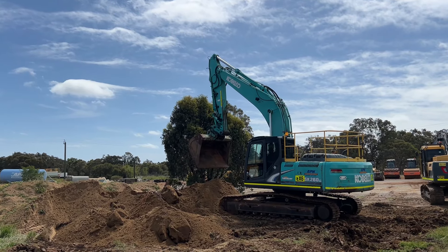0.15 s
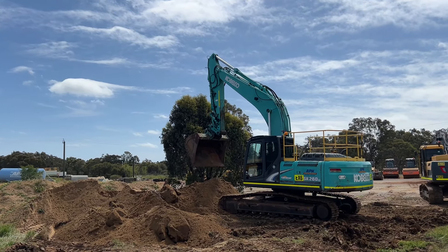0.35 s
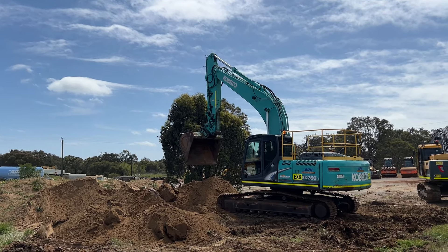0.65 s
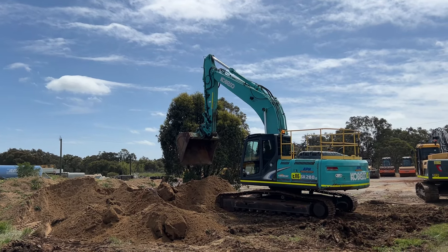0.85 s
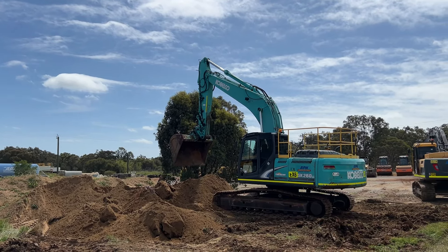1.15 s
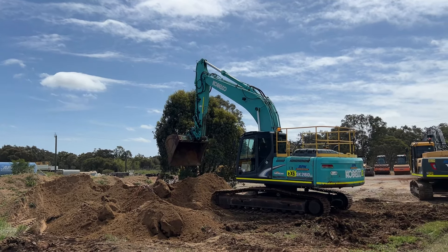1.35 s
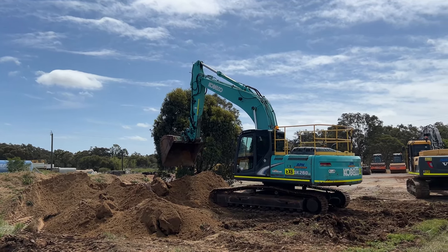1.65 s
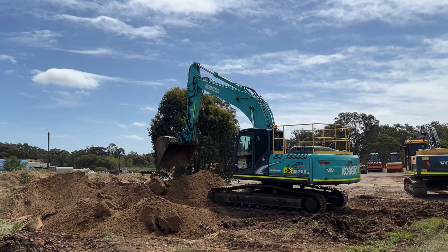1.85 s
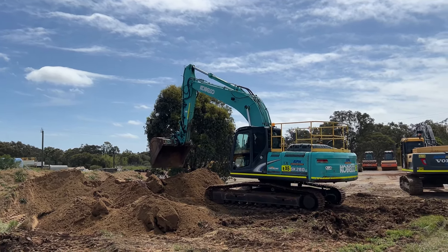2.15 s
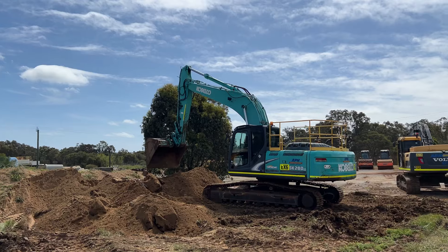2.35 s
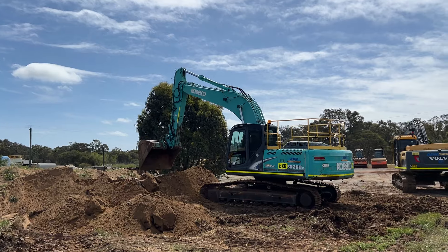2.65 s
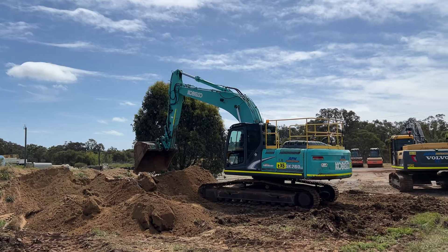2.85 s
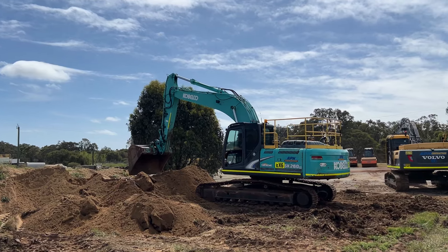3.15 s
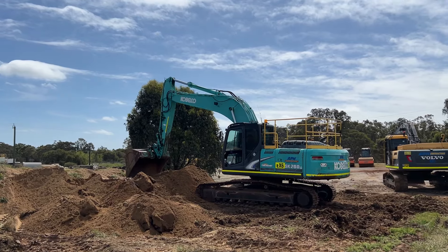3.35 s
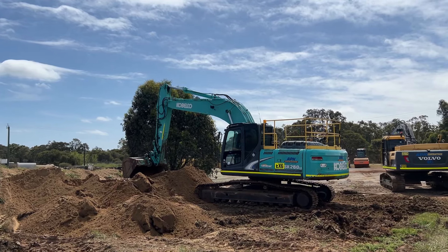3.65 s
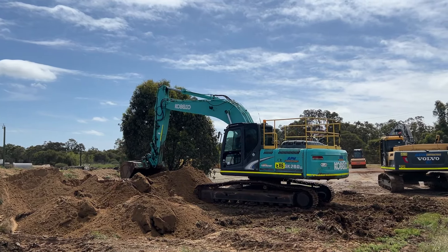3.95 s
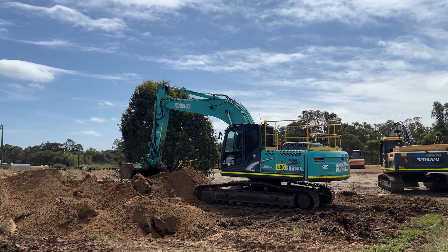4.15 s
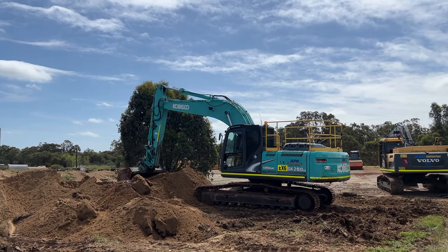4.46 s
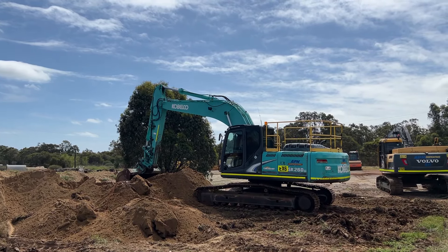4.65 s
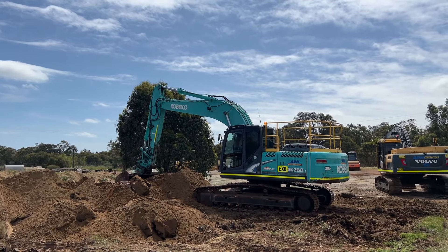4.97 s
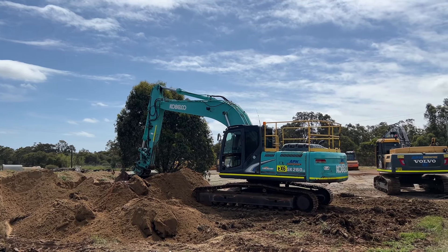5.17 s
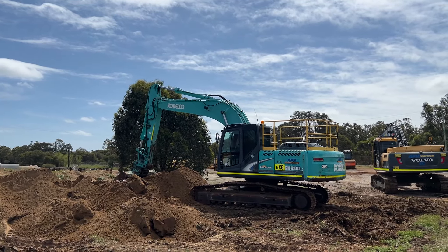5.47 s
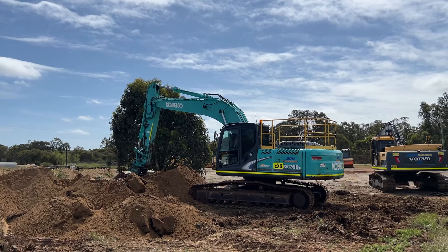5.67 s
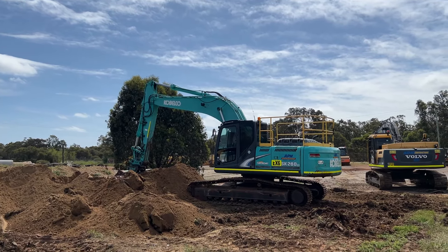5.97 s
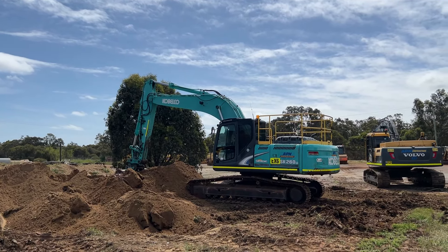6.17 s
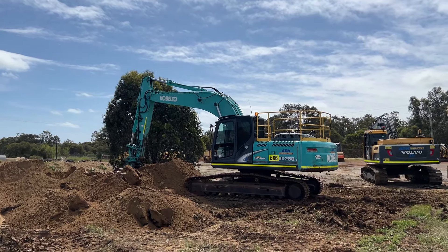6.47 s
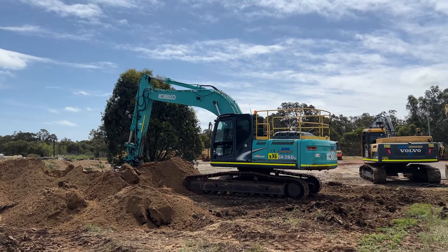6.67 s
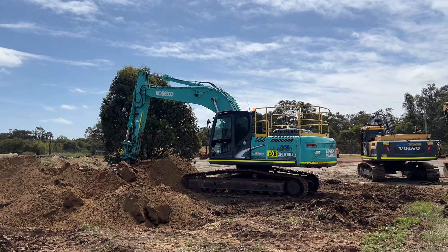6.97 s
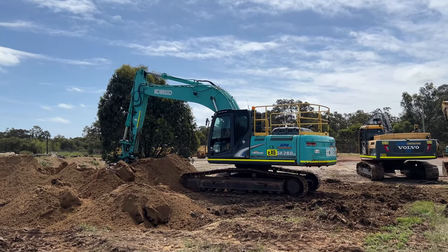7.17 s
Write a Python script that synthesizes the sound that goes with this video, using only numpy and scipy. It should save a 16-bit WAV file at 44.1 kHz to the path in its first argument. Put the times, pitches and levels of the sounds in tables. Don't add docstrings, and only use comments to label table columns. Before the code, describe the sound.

A buffeting, fluttering gust opens the scene and dies quickly, leaving a steady four-cylinder diesel rumble with knocking, gear rattle, cooling fan roar and a faint high turbo whistle. Other parked machines idle low behind it. Soft puffs of breeze brush the phone microphone. Midway the hydraulics whine and the engine labours; in the last second and a half a strong pump drone joins the lowered engine note. Open air, slightly distant stereo.

```python
import sys
import numpy as np
from scipy import signal
from scipy.fft import rfft, irfft
from scipy.io import wavfile
from scipy.ndimage import uniform_filter1d

SR = 44100
rng = np.random.default_rng(int(sys.argv[2]) if len(sys.argv) > 2 else 0)


def ratio_of_db(decibels):
    return 10 ** (np.asarray(decibels, float) / 20)


def wav_record(signal):
    frames = np.transpose(np.atleast_2d(signal))
    bounded = np.clip(frames, -1, 1)
    quanta = np.round(bounded * 32767).astype(np.int16)
    wavfile.write(sys.argv[1], SR, quanta)


N = 322812
T = np.arange(N) / SR
HZ = np.maximum(np.arange(N // 2 + 1) * SR / N, 1)
PORT_SIDES = np.array([[.5], [-.5]])

# time in seconds, firing rate in Hz.
FIRING = [
    (0, 74.65),
    (4.05, 74.65),
    (4.2, 73.3),
    (5.72, 73.25),
    (5.88, 72.65),
    (6.3, 72.3),
    (7.32, 72.25),
]
# time in seconds, pitch in Hz, level in dB rms.
TURBO = [(0, 12300, -80), (.8, 11600, -67), (3.2, 11440, -59), (3.95, 11450, -63), (4.15, 12500, -72),
         (4.6, 13710, -60), (5.0, 13200, -60), (5.6, 12800, -68), (6.2, 13300, -61), (6.6, 13200, -63),
         (7.32, 13100, -61)]


def columns(table):
    s, *rest = np.transpose(table)
    return [np.interp(T, s, c) for c in rest]


def walk(rate):
    hold = int(SR / rate)
    steps = np.repeat(rng.standard_normal(N // hold + 1), hold)
    return 0.99 * uniform_filter1d(uniform_filter1d(steps, hold), hold)[:N]


def colour(x, shape, db):
    hz, gain_db = np.transpose(shape)
    gain = ratio_of_db(np.interp(np.log(HZ), np.log(hz), gain_db, -120, -120))
    y = irfft(rfft(x) * gain, N)
    return y * ratio_of_db(db) / np.std(y)


def tone(turns, db, drift, breath_db=1.5):
    level = np.sqrt(2) * ratio_of_db(db + breath_db * walk(2.96))
    return level * np.sin(2 * np.pi * (turns + rng.random() + drift * walk(4.05)))


def rush(hz, db, width_hz):
    envelope = walk(width_hz) + 1j * walk(width_hz)
    carrier = np.exp(2j * np.pi * np.cumsum(hz) / SR)
    return ratio_of_db(db) * np.real(envelope * carrier)


def bands(x, edges_hz, gains_db):
    out, spectrum = x, rfft(x)
    below = [1 / (1 + (HZ / hz) ** 12) for hz in edges_hz]
    for low, high, gain_db in zip(below, below[1:], gains_db):
        out = out + (ratio_of_db(gain_db) - 1) * irfft(spectrum * (high - low), N)
    return out


def peaks(times, tops_db, rise, fall, floor_db):
    levels = [floor_db + 0 * T]
    for s, db in zip(times, tops_db):
        levels.append(db - np.where(T < s, rise * (s - T), fall * (T - s)))
    return np.max(levels, axis=0)


def gust():
    # time in seconds, rumble peak in dB, flutter peak in dB.
    bursts = [
        (.024, -16, -6),
        (.112, -14, -18),
        (.2, -20, -5),
        (.222, -11, -8),
        (.28, -30, -16),
        (.436, -27, -22),
    ]
    rise, fall = 550, 900
    fade_db = 37 * T
    times, low_db, flutter_db = np.transpose(bursts)
    low_db = peaks(times, low_db, rise, fall, -20 - fade_db)
    flutter_db = peaks(times, flutter_db, rise, fall, -26 - fade_db)
    low_shape = [(30, -30), (42, -6), (65, -5), (120, 0), (170, -17)]
    flutter_shape = [(130, -25), (200, 0), (450, -2), (700, -12), (1100, -35)]
    low = colour(rng.standard_normal(N), low_shape, -2.5) * ratio_of_db(low_db)
    flutter = colour(rng.standard_normal(N), flutter_shape, -13) * ratio_of_db(flutter_db)
    dying = np.clip((.62 - T) / .12, 0, 1) * np.clip(T / .006, 0, 1)
    return (low + flutter) * dying


def slaps():
    # time in seconds, peak in dB, swing rate in Hz, length in cycles.
    eddy_hits = [(0.0104, -8, 435, 1.04), (0.0186, -3.5, 372, 0.81), (.034, -10, 380, 0.92),
                 (.062, -9.5, 412, .5), (.096, -10, 398, .63), (.111, -9, 160, .33), (.192, -12, 450, 1),
                 (.199, -5, 317, 0.4), (.211, -8, 259, 1.24), (0.2187, -7, 290, 0.48),
                 (.2223, -7.5, 418, 0.4), (.281, -20, 382, 0.81), (.301, -24, 624, 1.4),
                 (.340, -16, 240, 0.46), (0.354, -21, 230, .8), (.382, -22, 200, 0.58),
                 (.413, -18, 448, .74), (.431, -20, 470, 1.8), (.455, -16.5, 378, .52),
                 (.477, -27, 250, .7), (.535, -22.5, 267, 1.05), (4.146, -17.5, 248, 3.3)]
    pan_db = 3.5
    out = np.zeros((2, N))
    for s, db, hz, cycles in eddy_hits:
        near = slice(max(int(s * SR) - 2000, 0), int(s * SR) + 2000)
        turns = (T[near] - s) * hz
        swing = np.cos(2 * np.pi * turns) + 0.063 * np.cos(2 * np.pi * 1.92 * turns)
        swell = np.exp(-(turns / cycles) ** 2)
        out[:, near] += swing * swell * ratio_of_db(db + pan_db * PORT_SIDES)
    return out


def breeze():
    # time in seconds, peak in dB.
    puffs = [
        (.06, -22.5),
        (.98, -26),
        (1.7, -27.5),
        (3.4, -41),
        (3.9, -39),
        (4.65, -38),
        (5.47, -30),
        (5.85, -31),
        (6.75, -31),
        (7.25, -32),
    ]
    shape = [(36, -34), (48, -5), (85, 0), (150, -4), (250, -17), (400, -38)]
    eddies = colour(rng.standard_normal((2, N)) * ratio_of_db(2.5 * walk(12)), shape, 1.2)
    return eddies * ratio_of_db(peaks(*np.transpose(puffs), rise=37, fall=37, floor_db=-38.5))


def engine_load():
    idle_hz, full_load_hz = 74.65, 72.25
    return (idle_hz - columns(FIRING)[0]) / (idle_hz - full_load_hz)


def exhaust(cycle, load):
    # multiple of the cycle, level in dB rms.
    orders = [
        (4, -23.5),
        (5, -44),
        (7, -33),
        (8, -32),
        (12, -39),
        (14, -42.5),
    ]
    beat = sum(tone(k * cycle, db, drift=0.029, breath_db=0.56) for k, db in orders)
    return beat + tone(15 * cycle, -53 + 17 * load, drift=0.031)


def gears(cycle, load):
    # multiple of the cycle, level in dB rms.
    meshes = [(62, -63), (63, -70), (64, -57.5), (78, -59.5), (83, -67), (97, -59.5), (104, -58),
              (108, -57.5), (123, -60.5), (132, -58)]
    rattle_db = 6 - 11 * load
    return sum(tone(k * cycle, db + rattle_db, drift=0.22) for k, db in meshes)


def pump(cycle, load):
    # time in seconds, drone level in dB rms.
    pressure = [(0, -58), (4.45, -45.5), (4.6, -33.5), (5.05, -43), (5.77, -40), (5.89, -22.5),
                (6.06, -19.5), (6.29, -25.5), (6.44, -21), (7.2, -25.5), (7.32, -23.5)]
    pistons = 18 * cycle
    drone = tone(pistons, columns(pressure)[0], drift=.03, breath_db=0)
    return drone + tone(pistons * 5, -64 + 17 * load, drift=.15)


def turbo_whistle():
    hz, db = columns(TURBO)
    return rush(hz, db, width_hz=450)


def valves():
    # time in seconds, centre in Hz, level in dB.
    strokes = [(0, 2296, -64), (2.3, 2322, -54), (3.2, 2235, -41), (3.7, 2180, -58), (4.2, 2300, -46.5),
               (5.0, 2327, -43), (5.9, 2286, -44.5), (6.7, 2179, -47), (7.32, 2245, -46)]
    hz, db = columns(strokes)
    second_hz = 1763 + .45 * (hz - hz.mean())
    return rush(hz, db, width_hz=100) + rush(second_hz, -48, width_hz=90)


def idlers():
    # pitch in Hz, level in dB rms.
    steady = [(39.7, -39), (42.3, -36), (50.3, -40), (59.6, -33.5), (65.3, -40), (79.7, -38.5), (89.8, -29),
              (100.4, -45.5), (108.7, -36.5), (166.2, -35), (179, -37), (212.6, -39), (239.9, -42.5),
              (623, -47)]
    return sum(tone(hz * T, db, drift=.04) for hz, db in steady)


def firing_blows(cycle):
    # strength of one cylinder in dB, in firing order.
    cylinder_db = [0.0, -7.0, -2.0, -9.0]
    firing = 4 * cycle
    return ratio_of_db(np.array(cylinder_db))[firing.astype(int) % 4] * np.exp(-(firing % 1) / 1.4)


def fan_roar(blow):
    # frequency in Hz, density in dB per Hz.
    shape = [(19, -42), (32, -8), (40, -5), (59, -1), (84, -8), (119, -4.5), (226, -9.5), (303, -17.5),
             (379, -18), (474, -15), (617, -19.5), (761, -24.5), (900, -26), (1170, -76), (1980, -120)]
    white = rng.standard_normal((3, N))
    return colour(white * (1 + 0.52 * blow) * ratio_of_db(1.0 * walk(9)), shape, -22)


def knock(cycle, blow):
    # frequency in Hz, density in dB per Hz.
    shape = [(380, -29), (650, -4.5), (747, -10), (875, -7), (964, -3), (1060, -9), (1170, -5.5),
             (1270, -9), (1480, -12), (1750, -8.5), (2070, -12), (2290, -10.5), (2670, -14), (3090, -25),
             (3400, -23), (4420, -52), (7480, -120)]
    white = rng.standard_normal((3, N))
    pattern, steps = rng.standard_normal((3, 2400)), np.arange(2400)
    place = (cycle + .0006 * walk(6)) * len(steps)
    clatter = np.array([np.interp(place, steps, p, period=len(steps)) for p in pattern])
    return colour((white + 0.57 * clatter) * (1 + 0.34 * blow) * ratio_of_db(0.6 * walk(14)), shape, -35.5)


def air_hiss(blow):
    # frequency in Hz, density in dB per Hz.
    shape = [(2300, -24), (3000, 3.5), (4000, 1.5), (4800, -1.5), (5600, -4.5), (7000, -10), (8300, -4.5),
             (9100, -2), (10200, -7.5), (11500, -11), (12000, -29), (12700, -17), (14900, -26),
             (15750, -34)]
    white = rng.standard_normal((3, N))
    hiss = colour(white * (1 + .12 * blow) * ratio_of_db(0.7 * walk(8.5)), shape, -46)
    spool_khz = columns(TURBO)[0] / 1000 - 12.4
    whoosh_db = -0.3 * spool_khz + .5 * walk(4.93)
    intake_db = -6 * spool_khz + 2.5 * walk(10)
    return bands(hiss, (6500, 14000, 19000), [whoosh_db, intake_db])


def ports(direct, scattered):
    # Hz, likeness from 0 to 1, right port's lead in radians, left minus right in dB; from 8 kHz the
    port_pair = [(30, 0.95, 0, -1), (340, 0.97, 0, 1.5), (560, 1, 0.5, -4), (868, 0.66, -2, -0.5),
                 (1240, 0.4, 1, 2.5), (1570, 0.78, 1.5, -1.5), (2000, 0.44, 0.17, -0.5), (2300, 0.9, 1, -2),
                 (2720, 0.43, 2, 3), (3080, 0.06, -3, 3.5),
                 (3700, .62, 0, 3), (4500, .5, -.1, 2.5), (5300, .2, .8, 1), (6200, .45, .2, 0),
             (7100, .3, -1.5, .5), (8000, .82, 0, -1), (9100, .88, 1.3, 0), (10200, .97, 3.14, 0),
             (12100, .95, 6.28, 0), (13800, .96, 9.42, 0), (15500, .93, 12.57, 0)]
    hz, *rest = np.transpose(np.array(port_pair))
    alike, lead, pan_db = (np.interp(HZ, hz, c) for c in rest)
    alike = np.clip(alike, 0, 1)
    shared = np.sqrt(alike) * np.exp(-1j * lead * PORT_SIDES) * rfft(direct)
    own = np.sqrt(1 - alike) * rfft(scattered)
    return irfft((shared + own) * ratio_of_db(pan_db * PORT_SIDES), N)


def wind_filter(x):
    # depth in dB, then closed, starting to open and open, all in seconds.
    ducks = [
        (-12.5, 0.21, 0.74, 1.05),
        (-10, 0.2, 0.83, 1.23),
        (-9, 0.32, 0.7, 1.26),
    ]
    closing_s = 0.15
    dips_db = []
    for db, shut, opening, opened in ducks:
        dips_db.append(np.interp(T, [shut - closing_s, shut, opening, opened], [0, db, db, 0]))
    return bands(x, (1, 125, 285, 600), dips_db)


def scene():
    cycle = np.cumsum(columns(FIRING)[0]) / SR / 4
    load, blow = engine_load(), firing_blows(cycle)
    tones = exhaust(cycle, load) + gears(cycle, load) + pump(cycle, load)
    tones = tones + turbo_whistle() + valves() + idlers()
    paths = fan_roar(blow) + knock(cycle, blow) + air_hiss(blow)
    direct = paths[0] + tones * signal.windows.tukey(N, .004)
    return wind_filter(ports(direct, paths[1:])) + gust() + slaps() + breeze()


def roll_off(x):
    return signal.sosfilt(signal.butter(12, 17100, fs=SR, output="sos"), x)


def record(dry):
    rumble_cut = signal.butter(10, 36, "high", fs=SR, output="sos")
    cut = signal.sosfilt(rumble_cut, dry)
    return roll_off(np.tanh(cut / 1.4) * 1.401)


dry = scene()
out = record(dry)
wav_record(out)
```